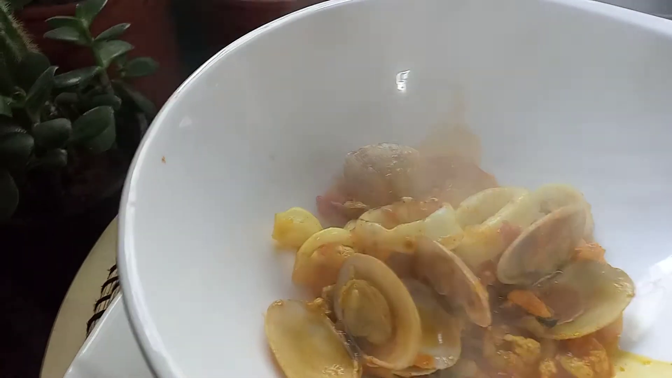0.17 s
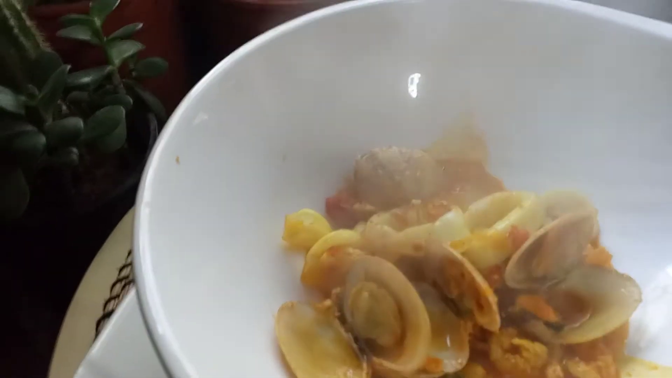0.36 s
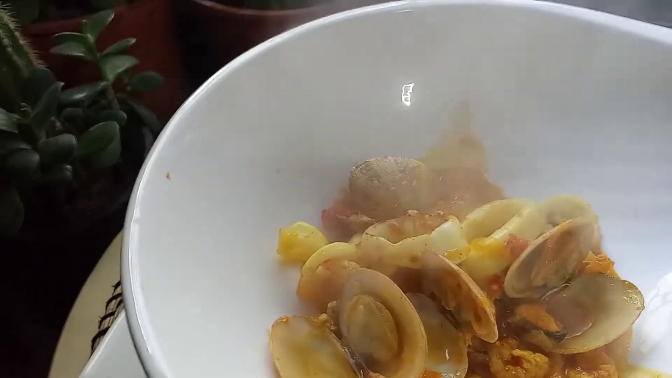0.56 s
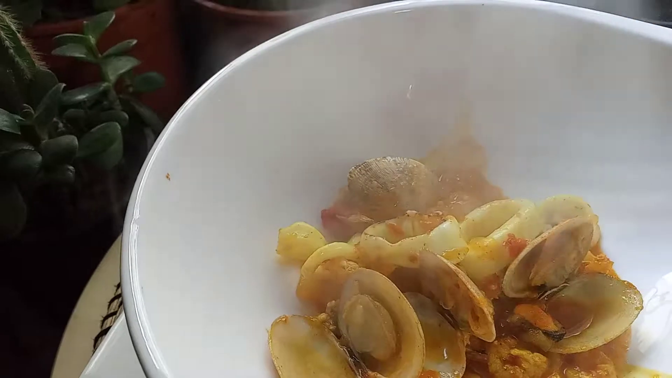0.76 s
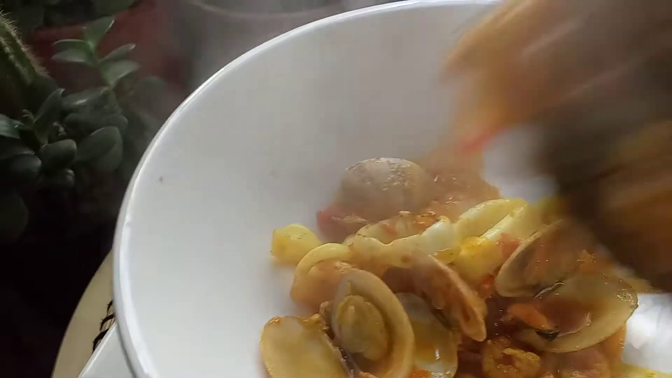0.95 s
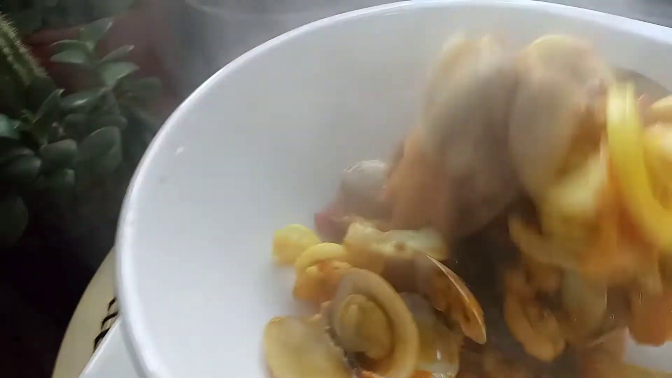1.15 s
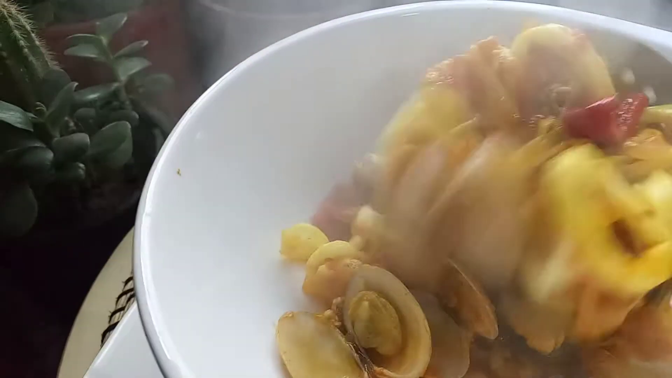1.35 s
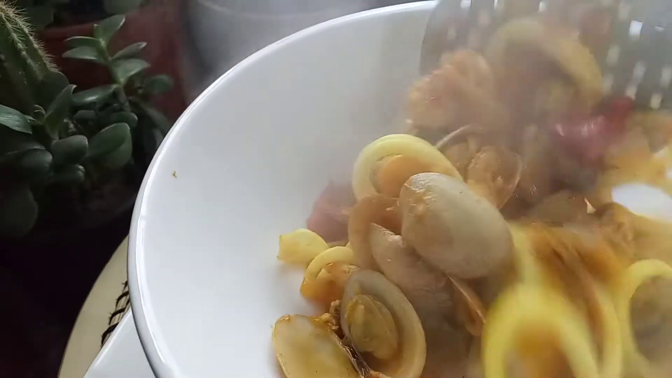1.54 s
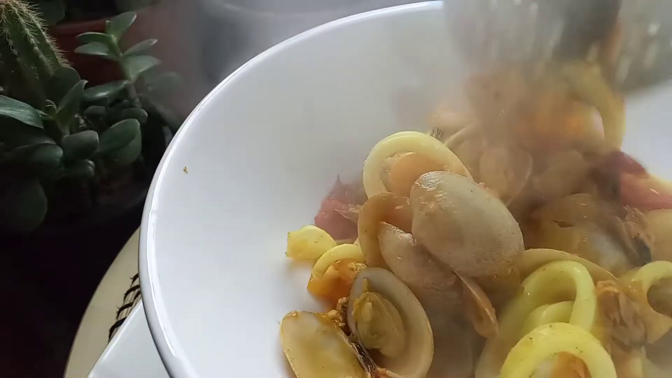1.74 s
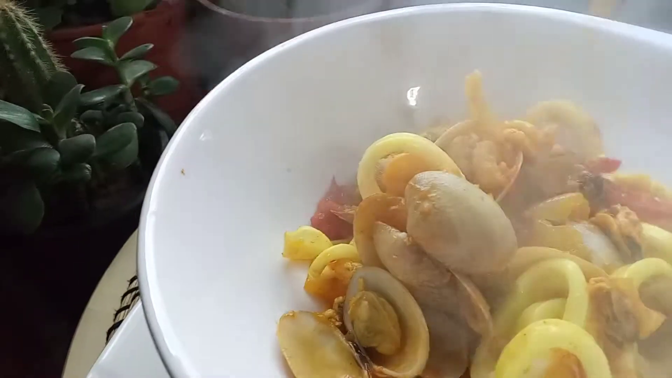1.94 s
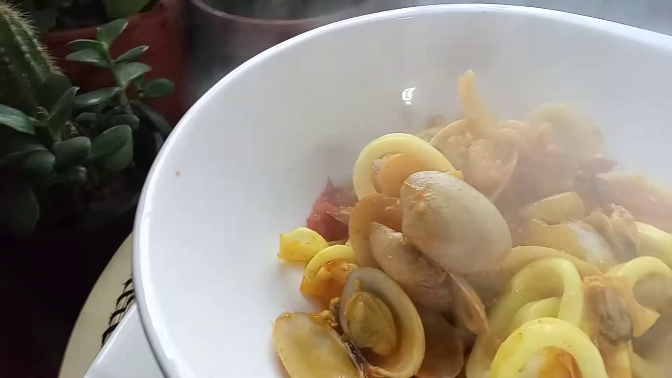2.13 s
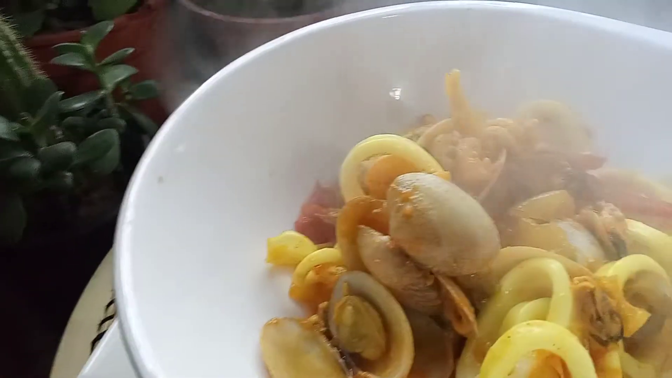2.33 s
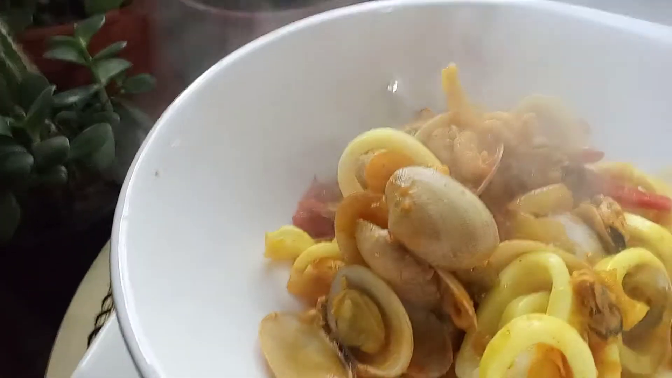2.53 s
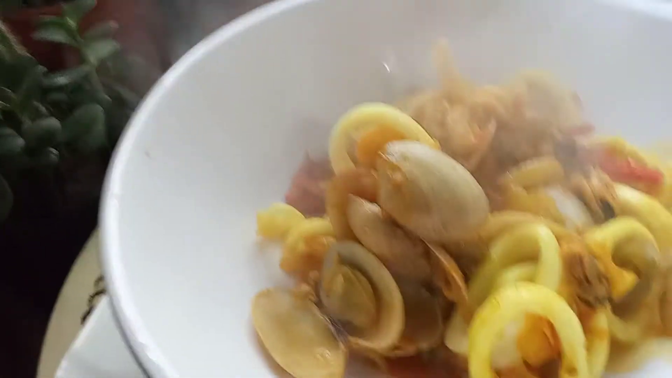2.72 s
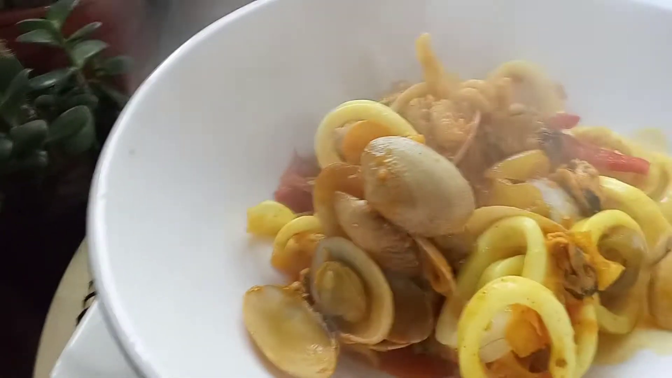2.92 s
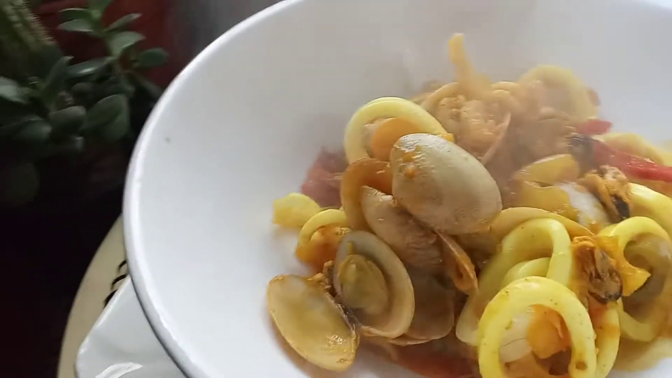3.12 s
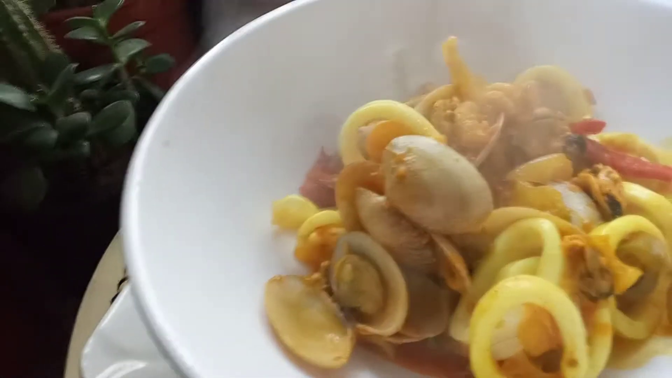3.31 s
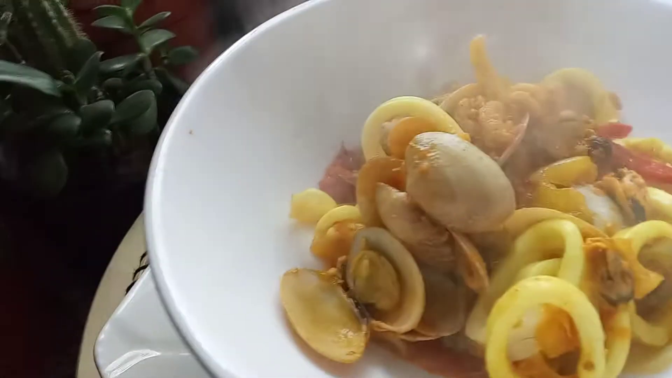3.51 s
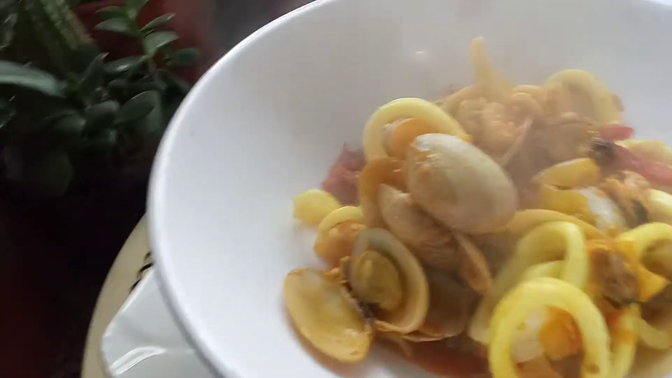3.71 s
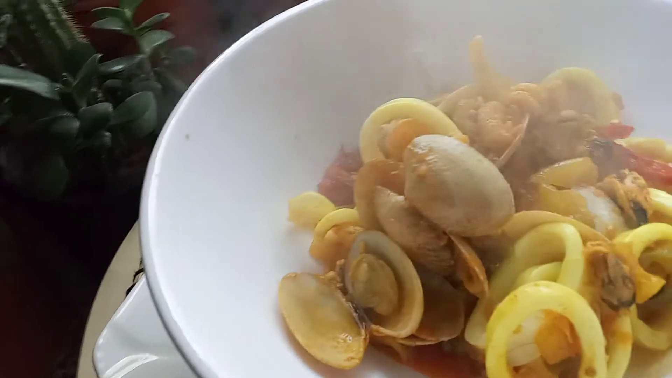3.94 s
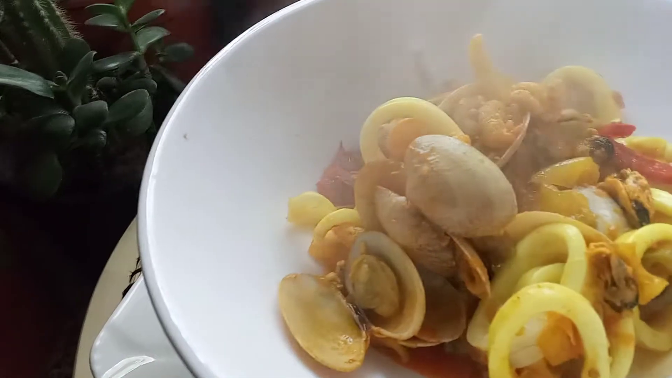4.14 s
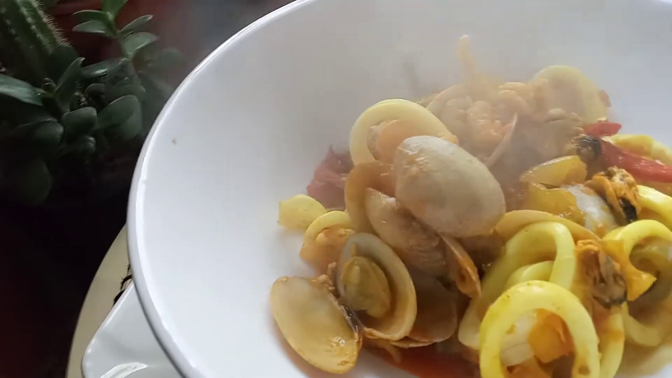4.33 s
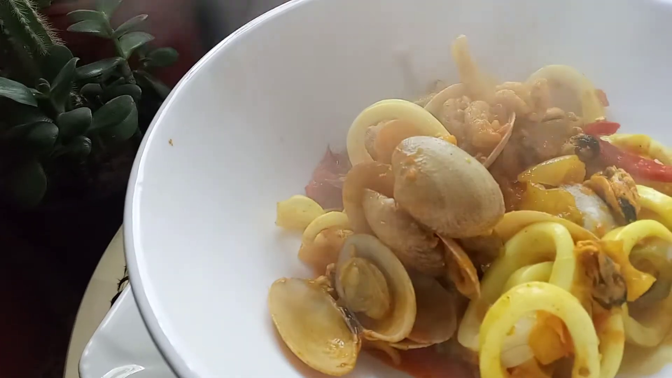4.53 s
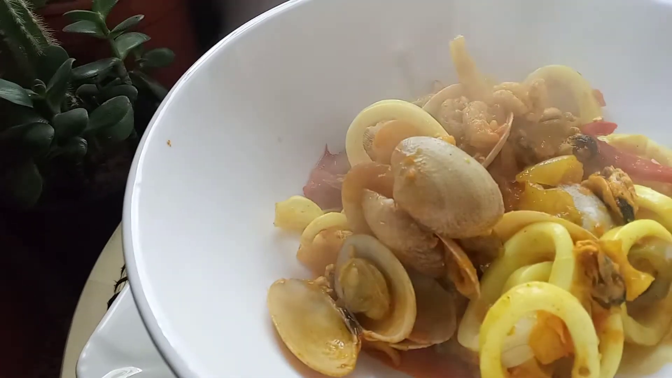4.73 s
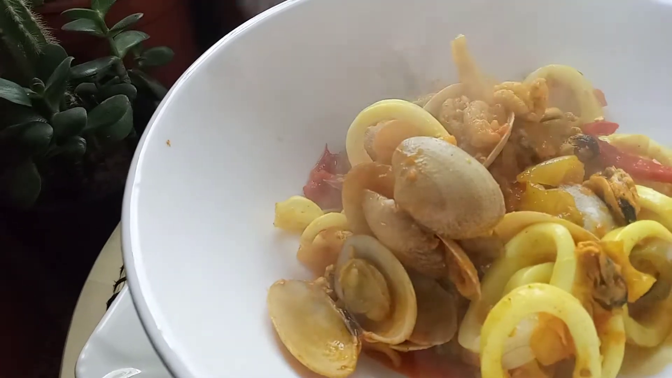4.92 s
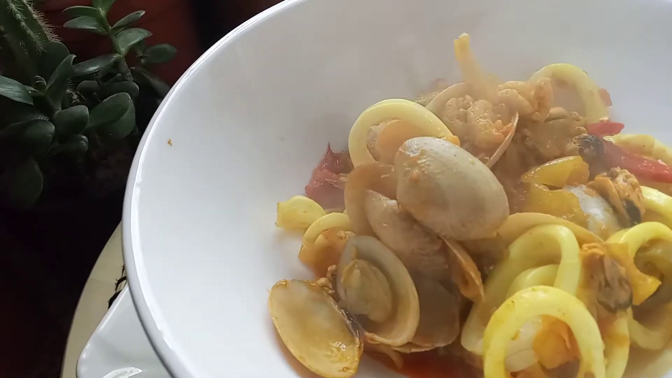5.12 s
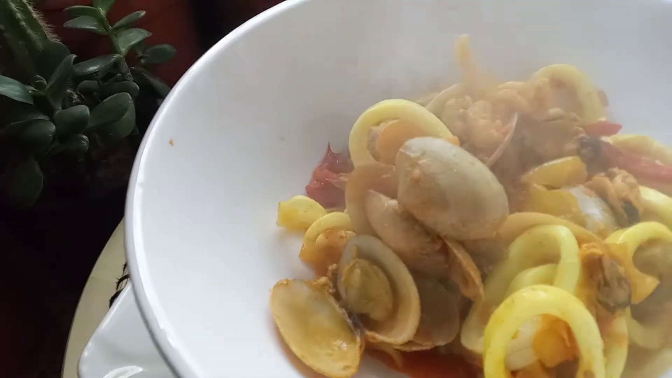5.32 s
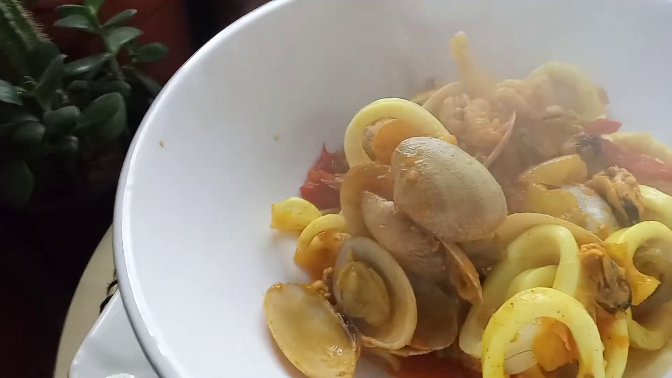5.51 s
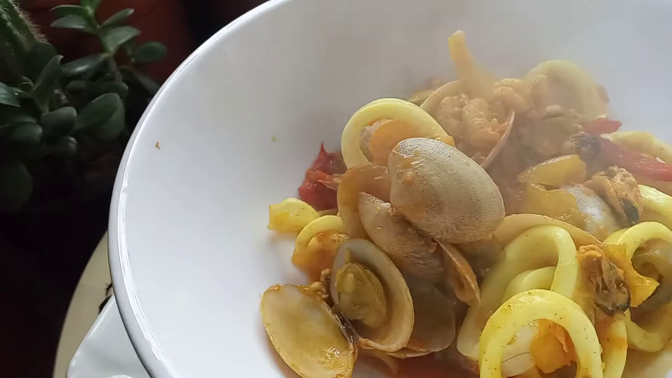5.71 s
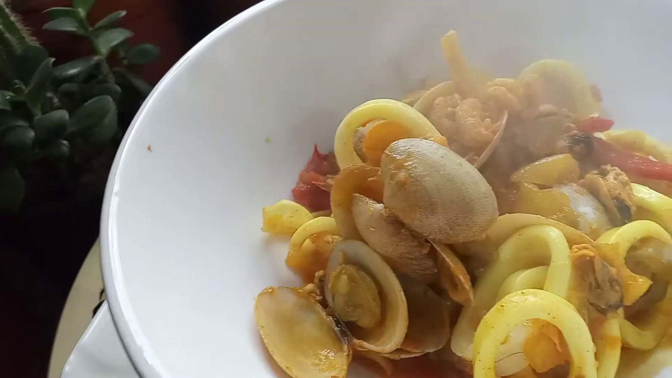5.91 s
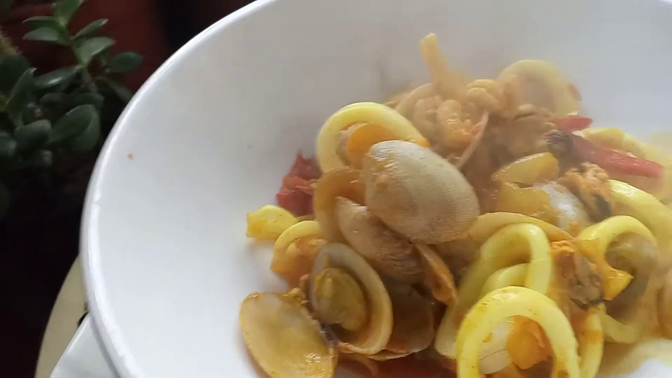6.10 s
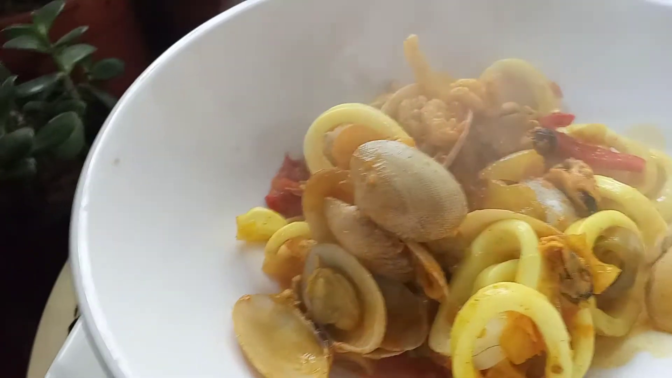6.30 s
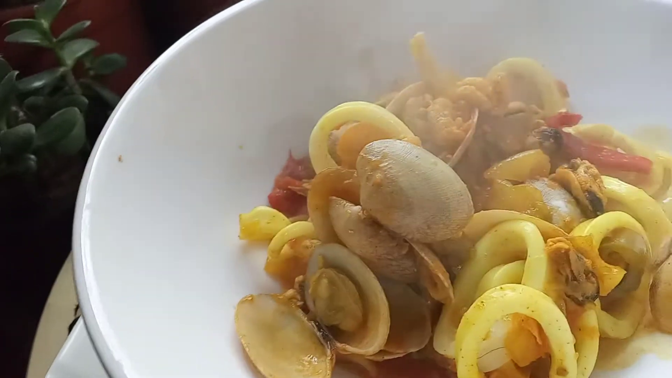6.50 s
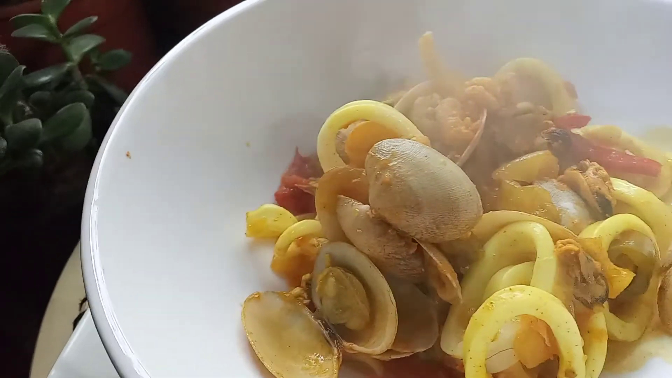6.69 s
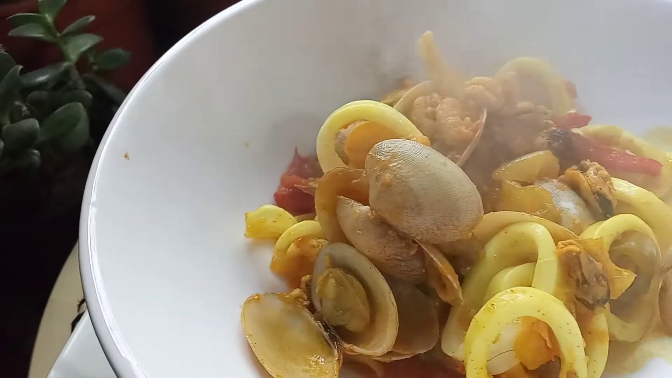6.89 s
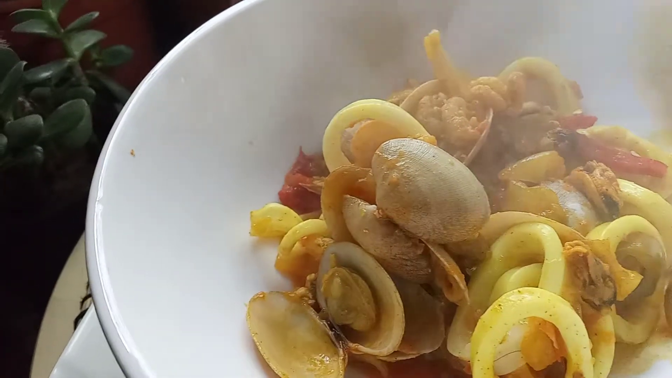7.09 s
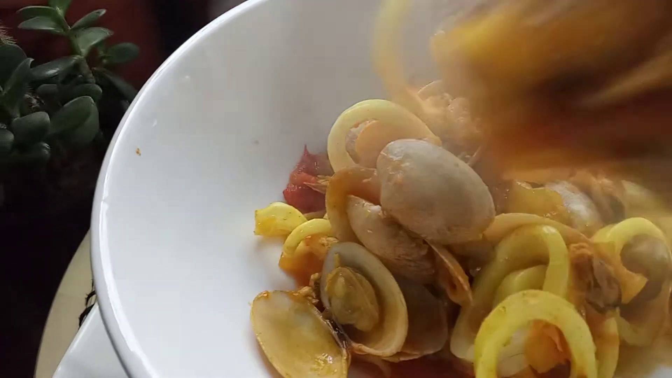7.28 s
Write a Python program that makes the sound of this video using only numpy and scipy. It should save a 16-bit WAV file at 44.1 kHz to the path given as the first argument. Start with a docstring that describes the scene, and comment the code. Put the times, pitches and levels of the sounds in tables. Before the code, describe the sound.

Clams and squid are spooned from a metal pan into a ceramic bowl, with shells clacking, gritty scraping, hard ringing knocks and wet bubbling over low hum.

```python
"""Sauce pops and bubbles softly over hiss and the hum of a kitchen appliance.
Then clams and squid are spooned from a metal pan into a bowl: the spoon knocks, shells tumble, the bowl rings.
The spoon scrapes up more; shells clack, wet food squelches and drains, and harder knocks ring shells and pan.
Struck things are noise bursts or dying tones, grinding is a rain of random clicks, hum and whistles are tones.
Loud sound drives a limiter, which briefly turns everything down, the hum included."""
import sys
import numpy as np
from scipy import signal
from scipy.fft import rfft, irfft
from scipy.io import wavfile
from scipy.ndimage import uniform_filter1d

SR = 44100
rng = np.random.default_rng(int(sys.argv[2]) if len(sys.argv) > 2 else 0)


def transcribe(signal):
    """Save signal, clipped to [-1, 1], as a 16-bit WAV file at the path in sys.argv[1]."""
    frames = np.atleast_2d(signal).T
    limited = np.clip(frames, -1, 1)
    pcm = np.round(limited * 32767).astype(np.int16)
    wavfile.write(sys.argv[1], SR, pcm)


N = 324135  # length in samples

GRIT_PER_S, WET_PER_S = 6000, 900  # average ticks a second in dense grit and in wet food
SHELL_WIDTH_HZ = 280  # half-width setting for the resonances of a wet shell
PUSH_DB = -35  # an ordinary push of the spoon


def amp(db):
    """Turns decibels into a gain."""
    return 10 ** (np.asarray(db) / 20)


def unit(x):
    """Scales a signal to an rms of one."""
    return x / np.sqrt(np.mean(x ** 2) + 1e-20)


def read(points, hz, column=1):
    """Reads one column of a table at any frequency, along a log-frequency axis."""
    columns = np.transpose(points)
    return np.interp(np.log(hz + 1), np.log(columns[0] + 1), columns[column])


def add(mix, start_s, sound):
    """Adds a two-channel sound to the mix at its start time."""
    part = mix[:, round(start_s * SR):][:, :sound.shape[1]]
    part += sound[:, :part.shape[1]]


def colour(x, curve_db, size=2048):
    """Filters with a gain curve in dB; a minimum-phase response keeps the filter from sounding early."""
    hz = abs(np.fft.fftfreq(size, 1 / SR))
    log_gain = np.log(amp(np.maximum(curve_db(hz), -100)))
    response = np.exp(np.conj(signal.hilbert(log_gain)))
    taps = np.fft.ifft(response).real[:size // 2]
    return signal.oaconvolve(x, taps[None], axes=1)[:, :x.shape[1]]


def slow_noise(rate_hz):
    """Noise that changes no faster than about the given rate, with an rms of one."""
    hz = np.fft.rfftfreq(N, 1 / SR)
    spectrum = rfft(rng.standard_normal(N)) / (1 + (hz / rate_hz) ** 4)
    return unit(irfft(spectrum, N))


def patches(shape, across, along):
    """Smoothed noise over frequency bins and time frames, with an rms of one."""
    noise = uniform_filter1d(rng.standard_normal(shape), size=along, axis=1)
    return unit(uniform_filter1d(noise, size=across, axis=0))


PORT_LAG = 22  # samples by which sound reaches the left microphone port later


def pair(a, b, same):
    """Two partly alike channels; the sound reaches the right port first."""
    left = np.concatenate([np.zeros(PORT_LAG), a[:-PORT_LAG]])
    right = same * a + np.sqrt(1 - same ** 2) * b
    return np.array([left, right])


def placed(x, lean_db):
    """Leans a two-channel sound to the left (positive) or the right (negative)."""
    return x * amp(np.array([[1], [-1]]) * lean_db / 2)


def swell(times_s, db):
    """Gain that follows a level curve and is silent outside it."""
    return amp(np.interp(np.arange(N) / SR, times_s, db, left=-np.inf, right=-np.inf))


ARCH_DB = 25.5  # how far the two ends of a sound lie under its middle


def arch(middle_s, length_s, db):
    """Gain that swells to its level and fades again."""
    away = 2 * (np.arange(N) / SR - middle_s) / length_s
    return amp(db - ARCH_DB * np.minimum(away ** 2, 20))


def uneven_ticks(per_s, spread_db):
    """Random moments, each with its own random strength; zero everywhere else."""
    strength = amp(spread_db * np.minimum(rng.exponential(1, N), 4))
    return strength * (rng.random(N) < per_s / SR)


def crackle(per_s, spread_db, spectrum):
    """Broad clicks of uneven size from slipping contacts, coloured by what they shake."""
    a, b = uneven_ticks(per_s, spread_db) * rng.standard_normal((2, N))
    return unit(colour(pair(a, b, same=0.46), lambda f: read(spectrum, f)))


def grains(per_s, spread_db, lo_hz, hi_hz, cycles, count=24, size=700):
    """A steady rain of tiny ringing ticks of many pitches; each fades to 1/e in the given cycles."""
    t, out = np.arange(size) / SR, np.zeros((2, N))
    kind = rng.integers(0, count, N)
    turns = rng.uniform(-np.pi, np.pi, count)
    push = uneven_ticks(per_s, spread_db) * rng.choice([-1, 1], N)
    for k, hz in enumerate(np.geomspace(lo_hz, hi_hz, count)):
        phase = np.array([[0], [turns[k]]])
        tick = np.sqrt(hz) * np.exp(-t * hz / cycles) * np.sin(2 * np.pi * hz * t + phase)
        out += signal.oaconvolve((push * (kind == k))[None], tick, axes=1)[:, :N]
    return unit(out)


def clumps():
    """Uneven gain: sticky food lets go in clumps."""
    return unit(amp(4.5 * slow_noise(45)))


def fizz():
    """Fine bright crackle of wet surfaces parting."""
    spectrum = [(1000, -27), (4000, -18.5), (7000, 2.5), (13000, -4.5), (15500, 1.5)]  # (Hz, dB)
    return clumps() * crackle(WET_PER_S, 3.5, spectrum)


def clack(pitches, decay_s, low_db, top_db, peak_db, width_hz, side_share=0.8, size=3000):
    """A brief contact wakes the crowded, fast-dying modes of a shell; a few stand out, the first most."""
    t = np.arange(size) / SR
    fade = np.exp(-np.maximum(t - .001, 0) / max(decay_s, .0003))
    onset = 1 - np.exp(-t / .00025)
    a, b = rng.standard_normal((2, size)) * fade * onset
    body = [(150, low_db - 11.5), (600, low_db - 3.5), (1500, low_db + 8.0), (2800, 3.35),
            (7500, -2.0), (10000, top_db), (16000, top_db)]  # (Hz, dB)

    def curve_db(f):
        peaks = [(side_share if k else 1) / (1 + ((f - hz) / width_hz) ** 2) for k, hz in enumerate(pitches)]
        return read(body, f) + peak_db * np.max(peaks, axis=0)

    x = colour(pair(a, b, same=0.063), curve_db)
    loudest = uniform_filter1d((x ** 2).mean(0), size=88).max()  # power over 2 ms
    return x / np.sqrt(loudest)


# How long the kitchen echoes. Each row: frequency in Hz, time to fade by 60 dB in seconds.
ROOM_FADE = [(200, 1), (1000, 0.58), (3000, 0.51), (7000, 0.41), (15000, 0.38)]


def kitchen(x, first_s=0.0017, near_db=6, near_s=0.008, size=30000):
    """Reflections from the near worktop, then from the walls, the treble dying first."""
    taps = rng.standard_normal((2, size)) * (rng.random((2, size)) < .2)
    taps = taps * (np.arange(size) > first_s * SR)
    taps = taps * (1 + amp(near_db) * np.exp(-np.arange(size) / SR / near_s))
    hz, t, z = signal.stft(taps, SR, nperseg=256)
    fade = amp(-60 * t / read(ROOM_FADE, hz)[:, None])
    tail = signal.istft(z * fade, SR, nperseg=256)[1]
    return signal.fftconvolve(x, tail / np.linalg.norm(tail[0]), axes=1)[:, :N]


HUM_HZ = 100  # twice the mains frequency


def hum(level_db=-47.5, waver=0.22, flutter_hz=24, lean_db=2.5):
    """An appliance hums at twice the mains frequency, wavering a little, louder on the right."""
    drift = 1 + waver * (slow_noise(flutter_hz) + 1j * slow_noise(flutter_hz))
    tone = drift * np.exp(2j * np.pi * HUM_HZ * np.arange(N) / SR)
    return amp(level_db + lean_db * np.array([[-1], [1]])) * unit(tone.real)


# Background hiss, before its overall trim.
# Each row: frequency in Hz, left level in dB per Hz, right level in dB per Hz.
HISS_SPECTRUM = [(25.2, -102.5, -93), (59, -82.5, -72.5), (142.6, -76, -105), (298, -99.5, -84),
                 (670, -99.0, -97), (1230, -103.0, -103.0), (2130, -97, -96), (3600, -105.0, -106.0),
                 (4680, -104.0, -105.0), (7430, -87, -105.0), (8750, -107.0, -106.0),
                 (11100, -119.0, -94.5), (12440, -120.0, -109.0), (15300, -109.0, -104.0)]


def hiss(level_db=-0.5, same_hz=450):
    """Background noise, alike in both ports only in the bass; its lower middle drifts in patches."""
    hz = np.fft.rfftfreq(N, 1 / SR)
    a, b = rfft(rng.standard_normal((2, N)))
    same = 1 / (1 + (hz / same_hz) ** 2)
    left = a * amp(read(HISS_SPECTRUM, hz, column=1))
    right = (same * a + np.sqrt(1 - same ** 2) * b) * amp(read(HISS_SPECTRUM, hz, column=2))
    x = amp(level_db) * np.sqrt(SR / 2) * irfft(np.array([left, right]), N)
    hz, _, z = signal.stft(x, SR, nperseg=1024)
    middle = ((hz > 200) & (hz < 2500))[:, None]
    drift_db = 2.5 * patches(z.shape[1:], across=4, along=12) * middle
    return signal.istft(z * amp(drift_db), SR, nperseg=1024)[1][:, :N]


# Sticky pops of sauce. Each row: start in seconds, level in dB before the group's gain, pitch in Hz.
SAUCE_POPS = [(0.099, -35.5, 14600), (0.115, -41.5, 6400), (0.175, -35.5, 13800), (0.206, -33, 6560),
              (0.282, -28.5, 7200), (0.308, -46, 9600), (0.422, -37, 6500), (0.437, -49, 14500),
              (0.472, -40, 13900), (0.454, -39, 6900), (0.48, -41, 3860), (0.536, -43, 7300),
              (1.278, -29, 11100), (1.302, -23.5, 10800), (1.624, -46, 7350), (1.664, -43, 7000),
              (2.391, -45.5, 6340), (4.515, -35, 6940), (4.593, -31, 6600), (4.611, -30.5, 3440),
              (4.863, -32, 4300), (5.27, -33.5, 6000), (5.397, -35.5, 6950), (5.592, -39, 6200),
              (5.653, -42, 5000), (5.689, -37, 6660), (5.703, -41, 4500), (5.839, -39, 6800),
              (5.928, -33.5, 7200), (6.017, -33, 6640), (6.038, -35.5, 6660), (6.169, -20, 14500),
              (6.2, -27, 10400), (6.296, -27, 6500), (6.446, -37, 5500), (6.561, -43, 7830),
              (6.585, -35, 6130), (6.67, -37, 7100), (6.72, -31, 4190), (6.738, -31, 6900)]


def pops(gain_db=-4):
    """Films of sauce snap: very short, bright noise bursts with almost no low body."""
    out = np.zeros((2, N))
    for start_s, db, hz in SAUCE_POPS:
        snap = clack([hz], decay_s=0.0031, low_db=-69, top_db=0.5, peak_db=19.0, width_hz=1400)
        add(out, start_s, amp(db + gain_db) * snap)
    return placed(out, lean_db=4.0)


# Air pockets bursting in the sauce.
# Each row: start in seconds, level in dB before the group's gain, starting pitch in Hz.
AIR_POCKETS = [(0.118, -40, 3960), (0.2201, -28, 2370), (0.455, -36.5, 2670), (0.483, -36, 2950),
               (4.397, -21, 1686), (4.417, -23.5, 3260), (4.487, -27, 2580), (4.523, -31, 1594),
               (4.6446, -23, 1620), (4.649, -19.5, 1030), (4.585, -28, 3360), (4.894, -32, 2000),
               (4.914, -41, 1490), (4.977, -30, 2370), (5.097, -25.5, 1880), (5.12, -34, 1550),
               (5.135, -34, 1130), (5.234, -34, 1560), (5.356, -34, 1650), (5.555, -32, 3230),
               (5.707, -26, 2980), (5.32, -18.5, 1995), (5.422, -30.5, 1400), (5.447, -21.5, 1610),
               (5.963, -26.5, 1530), (6.766, -25.5, 1035)]
BUBBLE_CYCLES = 7.1  # an air pocket fades to 1/e in this many cycles, so low ones ring longer


def bubbles(gain_db=-2, rise=1.15, size=2500):
    """Each air pocket rings for a few cycles and rises slightly in pitch as it opens."""
    out, t = np.zeros((2, N)), np.arange(size) / SR
    for start_s, db, hz in AIR_POCKETS:
        decay_s = BUBBLE_CYCLES / hz
        note = np.sin(2 * np.pi * hz * t * (1 + rise * t)) * np.exp(-t / decay_s)
        snap = 0.12 * rng.standard_normal((2, size)) * np.exp(-2 * t / decay_s)
        add(out, start_s, amp(db + gain_db) * pair(note + snap[0], note + snap[1], same=1.0))
    return out


RING_FLUTTER, FLUTTER_HZ = .2, 60  # settling food makes each mode flutter: depth, changes a second


def ring(modes, tilt=0, size=40000):
    """Dying modes, each with its own phase at the two ports; a soft blow (negative tilt) favours the low."""
    t, out = np.arange(size) / SR, np.zeros((2, size))
    hz, db, t60 = np.transpose(modes)
    gain = amp(db + tilt * np.log2(hz))
    start, apart = rng.uniform(-np.pi, np.pi, (len(modes), 2)).T
    apart = apart / 2 + np.pi * ((hz > 500) & (hz < 700))  # these modes are turned round between the ports
    for g, f, fade_s, phase, shift in zip(gain, hz, t60, start, apart):
        shake = 1 + RING_FLUTTER * np.interp(t, np.arange(200) / FLUTTER_HZ, rng.standard_normal(200))
        wave = np.sin(2 * np.pi * f * t + phase + np.array([[0], [shift]]))
        out += g * shake * amp(-60 * t / fade_s) * wave
    return out / np.linalg.norm(gain)


# Hard knocks. Each row: start in seconds, contact level in dB, contact decay in seconds, its low body in dB,
# its send to the room in dB, three shell resonances in Hz, what rings on, ring level in dB,
# tilt of the ring in dB per octave.
HARD_KNOCKS = [(0.990, -0.5, 0.0044, -5, -12, 3560, 4870, 6650, "shell", -16, -5),
               (1.289, -19, 0.0064, -22, -3, 1980, 5340, 4220, "bowl", -24, -3),
               (1.381, -6, 0.0059, -18, -14, 5500, 7800, 4300, "bowl", -10.5, -0.5),
               (1.386, -5.5, 0.0047, -9.5, -7.5, 4400, 5460, 7600, "shell", -32.5, 3),
               (4.7, -6, 0.0012, -9, -7, 5500, 6620, 7500, "shell", -36, 6),
               (4.707, -5, 0.0033, -11.5, -7.5, 2880, 3720, 2070, "shell", -25, 1),
               (5.757, -8.5, 0.0013, -12, -10, 1738, 6600, 5720, "shell", -39, -14.5),
               (6.111, 1.5, 0.0086, -8.5, -14, 3570, 2870, 4570, "pan", -10, -1),
               (6.168, 1, 0.0048, -19.5, -9, 7900, 7700, 7650, "pan", -21.5, -4),
               (7.347, -15, 0.00077, -13.5, -16, 2960, 3160, 6330, "shell", -40, 13.5)]
# What the bowl rings with. Each row: frequency in Hz, relative level in dB, time to fade by 60 dB in seconds.
BOWL_MODES = [(530, -16, .35), (640, -17, .35), (1125, -9, .33), (1195, -10.5, .57), (1981, -5, .5),
              (2072, -8, .42), (3138, 2.5, .45), (3327, -16, .33), (4151, -7.5, .42), (4393, -4.5, .4),
              (4740, -18, .35), (5445, -7, .35), (5785, -5, .34), (6315, -20, .42), (7117, -18, .42),
              (7420, -14, .33), (7478, -14, .36), (7671, -16, .28), (8120, -20, .35), (8452, -20, .28),
              (8861, -19, .29)]
# What the pan rings with. Each row: frequency in Hz, relative level in dB, time to fade by 60 dB in seconds.
PAN_MODES = [(232, -14.5, .45), (345, -20, .3), (570, -13, .4), (1095, -9.5, .44), (1157, -17, .35),
             (1997, -14, .55), (2353, 1.5, .48), (2392, -12, .35), (2772, -2.5, .38), (2850, -7, .45),
             (2961, -0.5, .47), (3030, -8, .42), (3085, -11, .55), (3500, -5.5, .43), (3550, -8, .35),
             (4283, -15, .5), (4775, -13, .5), (4856, -11, .45), (5324, -15, .44), (5895, -17, .45),
             (6019, -15, .43), (6611, -13, .45), (7262, -12, .4), (7628, -17, .38), (7876, -14, .34)]
# A shell's modes lie in close groups. Each entry: ratio to the group's resonance.
SHELL_RATIOS = (.962, .989, 1.008, 1.035)
SHELL_CYCLES = 760  # a ringing shell fades by 60 dB in this many cycles of its resonance


def knocks(ring_room_db=-18):
    """Spoon and shells strike hard, and the bowl, the pan or the shell itself rings on."""
    near, sent = np.zeros((2, 2, N))
    for start_s, db, decay_s, low_db, room_db, *pitches, struck, ring_db, tilt in HARD_KNOCKS:
        shell = [(hz * ratio, 0, SHELL_CYCLES / hz) for hz in pitches for ratio in SHELL_RATIOS]
        modes = {"bowl": BOWL_MODES, "pan": PAN_MODES, "shell": shell}[struck]
        contact = amp(db) * clack(pitches, decay_s, low_db, top_db=-15, peak_db=13.5, width_hz=SHELL_WIDTH_HZ)
        ringing = amp(ring_db) * ring(modes, tilt)
        for sound, send_db in (contact, room_db), (ringing, ring_room_db):
            add(near, start_s, sound)
            add(sent, start_s, amp(send_db) * sound)
    return near + kitchen(sent)


# The spoon bumps the bowl or the floor of the pan.
# Each row: start in seconds, peak level in dB before the group's gain, pitch in Hz.
BUMPS = [(0.991, -33, 706), (2.742, -34, 297), (2.931, -29.5, 590), (2.978, -29, 644), (3.268, -31, 430),
         (3.477, -29, 365), (3.522, -22, 360), (3.586, -21.5, 660), (6.111, -30, 630), (6.229, -30, 424)]
# Colour of low bumps and rubbing. Each row: frequency in Hz, level in dB.
RUB_SPECTRUM = [(88, -55), (150, -22.5), (243, -4), (312, -4.5), (360, -1), (528, -5), (662, 1.5),
                (743, -11), (1100, 0.5), (1430, -39), (2420, -120)]


def thuds(gain_db=4, decay_s=0.022, peak_db=9, width_hz=90, size=5000):
    """A dull push is a dying noise burst with low resonances; one stands out."""
    out, t = np.zeros((2, N)), np.arange(size) / SR
    for start_s, db, hz in BUMPS:
        push = rng.standard_normal((2, size)) * np.exp(-t / decay_s)
        curve_db = lambda f: read(RUB_SPECTRUM, f) + peak_db / (1 + ((f - hz) / width_hz) ** 2)
        x = colour(push, curve_db, size=8192)
        add(out, start_s, amp(db + gain_db) * x / abs(x).max())
    return out


# Shells clacking. Each row: start in seconds, level in dB before the group's gain,
# main resonance in Hz, second resonance in Hz, decay in seconds.
SHELL_CLACKS = [(1.003, -9.5, 3420, 5100, 0.0032), (1.01, -9.5, 3450, 5370, 0.0069),
                (1.019, -17, 5000, 3600, 0.0084), (1.027, -18, 3340, 5100, 0.0054),
                (1.034, -13, 3600, 5160, 0.0027), (1.083, -24, 2130, 3520, 0.0074),
                (1.194, -32, 1800, 2450, 0.0013), (1.25, -26.5, 1400, 2640, 0.0055),
                (1.260, -19, 1630, 2600, 0.01), (1.276, -21, 2320, 1490, .006),
                (1.322, -23, 1790, 2670, 0.0077), (1.416, -16.5, 5500, 7600, 0.013),
                (1.523, -17, 4880, 6000, 0.0022), (2.709, -39, 2120, 3640, 0.0025),
                (2.740, -22.5, 3300, 6460, 0.0075), (2.861, -17.5, 3900, 6540, 0.0088),
                (2.909, -20, 3350, 2500, 0.0019), (2.934, -18, 2900, 3500, 0.003),
                (3.032, -33, 3450, 2330, 0.0019), (3.089, -23, 1060, 1870, 0.012),
                (3.134, -26, 2780, 1490, 0.0058), (3.282, -35.5, 6750, 2670, 0.0092),
                (3.326, -26.5, 2670, 3980, 0.0025), (3.479, -15.5, 3270, 3880, 0.0019),
                (3.532, -17.5, 3950, 3220, 0.0066), (3.568, -16.5, 2820, 3900, .008),
                (3.589, -15.5, 2960, 6480, 0.011), (3.601, -29, 2840, 6360, 0.0089),
                (3.642, -8.5, 4630, 6500, 0.0017), (3.863, -26, 2940, 2180, 0.0086),
                (4.072, -15.5, 4630, 1230, 0.0016), (4.164, -28.5, 3120, 1793, 0.0022),
                (4.215, -14.5, 2820, 2440, 0.0092), (4.258, -18.5, 6800, 4670, 0.0027),
                (4.278, -25.5, 7440, 2400, 0.0056), (4.302, -23.5, 5380, 3580, 0.0061),
                (4.444, -23.5, 2830, 3130, 0.0062), (5.011, -15, 3230, 7250, 0.002),
                (5.167, -27, 5850, 3050, 0.017), (5.288, -25, 2900, 3770, 0.0047),
                (5.292, -25.5, 6670, 1600, .004), (5.304, -27.5, 7400, 5500, 0.002),
                (5.448, -26, 1630, 5000, 0.0049), (5.719, -24.5, 4420, 1870, 0.0017),
                (5.971, -27, 6970, 3160, 0.0082), (5.988, -26.5, 3210, 2600, 0.0078),
                (6.198, -14, 7250, 6350, 0.0021), (6.233, -16, 7450, 6540, 0.0031)]


def clacks(gain_db=-3):
    """Shell meets shell: all share one body colour, each with its own two resonances."""
    out = np.zeros((2, N))
    for start_s, db, *pitches, decay_s in SHELL_CLACKS:
        hit = clack(pitches, decay_s, low_db=-8.5, top_db=-20, peak_db=13, width_hz=SHELL_WIDTH_HZ)
        add(out, start_s, amp(db + gain_db) * hit)
    return out


def shifting(x):
    """As one shell after another meets the spoon, resonances come and go, some 350 Hz wide and 50 ms long."""
    z = signal.stft(x, SR, nperseg=512)[2]
    gain = amp(3 * patches(z.shape[1:], across=4, along=9))
    return unit(signal.istft(z * gain, SR, nperseg=512)[1][:, :N])


# The scraping spoon makes the loaded pan sing. Each row: frequency in Hz, width in Hz, level in dB.
SING_RESONANCES = [(590, 81, -6), (1000, 125, 0.5), (2820, 180, 4), (6400, 210, -9)]


def singing():
    """Slips of the spoon feed a few damped resonances of the pan."""
    slips = crackle(WET_PER_S, spread_db=2.5, spectrum=[(20, 0), (20000, 0)])

    def curve_db(f):
        gain = sum(amp(db) / (1 + (2 * (f - hz) / width) ** 2) for hz, width, db in SING_RESONANCES)
        return 20 * np.log10(gain)

    return unit(colour(slips, curve_db))


# Colour of grinding shells. Each row: frequency in Hz, level in dB.
GRIT_SPECTRUM = [(350, -52), (600, -8.5), (954, -7), (1040, 0), (1260, 0), (1880, 0), (3650, 2.5),
                 (5250, -10), (7270, -7.5), (9340, -29.5), (12000, -35), (15600, -45), (22000, -120)]
# A spoonful tumbling into the bowl. Each row: time in seconds, effort in dB.
TUMBLE_EFFORT = [(1.189, -47), (1.24, -41.5), (1.255, -34), (1.295, -26), (1.321, -14), (1.345, -64)]
# How hard the spoon pushes through the shells in the pan. Each row: time in seconds, effort in dB before a trim.
SCOOP_EFFORT = [(2.861, -43), (2.93, -41), (3.02, -39), (3.1, -34.5), (3.15, -37), (3.22, -47),
                (3.45, -39.5), (3.55, -33), (3.587, -24.5), (3.649, -34.5), (3.8, -47.5), (3.95, -39.5),
                (4.1, -42), (4.19, -50.5), (4.28, -36.5), (4.437, -46)]
# The food is jolted when the pan is knocked, then settles.
# The one row: start in seconds, effort in dB, fall in dB a second.
PAN_JOLT = (6.14, -28, 75)
RUB_PER_DB, FIZZ_PER_DB = .8, 1.2  # dB gained per dB of effort; the rub of the jolt gains 2 instead
CUSHION_DB_PER_S = 5.5  # food gathering under the spoon cushions the scoop's low rub


def scraping(grit_db=-2.0, chip_db=-5.5, sing_db=-10, fizz_db=-19, scoop_db=2,
             scoop_rub_db=-41, jolt_rub_db=-60, tumble_rub_db=-62):
    """Shells grind and chip over each other and the pan; one effort drives grit, low rub and wet fizz."""
    t = np.arange(N) / SR
    slips = unit(amp(2 * slow_noise(70)))
    grit = amp(grit_db) * shifting(crackle(GRIT_PER_S, spread_db=1.0, spectrum=GRIT_SPECTRUM))
    chips = grains(WET_PER_S, spread_db=1.0, lo_hz=665.0, hi_hz=8240, cycles=19)
    chips = amp(chip_db) * unit(colour(chips, lambda f: read(GRIT_SPECTRUM, f)))
    grit = slips * (grit + chips)
    sing = amp(sing_db) * slips * singing()
    rub = grains(per_s=1100, spread_db=6.0, lo_hz=196.1, hi_hz=927, cycles=9.4, size=4000)
    rub = slips * unit(colour(rub, lambda f: read(RUB_SPECTRUM, f)))
    # each effort is one at an ordinary push
    tumble = swell(*np.transpose(TUMBLE_EFFORT)) / amp(PUSH_DB)
    scoop = swell(*np.transpose(SCOOP_EFFORT)) * amp(scoop_db - PUSH_DB)
    jolt_s, jolt_db, fall = PAN_JOLT
    jolt = swell([jolt_s, jolt_s + 1], [jolt_db, jolt_db - fall]) / amp(PUSH_DB)
    effort = tumble + scoop + jolt
    cushion = amp(-CUSHION_DB_PER_S * np.maximum(t - SCOOP_EFFORT[0][0], 0))
    press = amp(tumble_rub_db) * tumble ** RUB_PER_DB
    press = press + amp(scoop_rub_db) * cushion * scoop ** RUB_PER_DB
    press = press + amp(jolt_rub_db) * jolt ** 2
    wet = amp(fizz_db) * effort ** FIZZ_PER_DB * fizz()
    return amp(PUSH_DB) * (effort * grit + scoop * sing + wet) + press * rub


# Faint thin whistles, perhaps of steam.
# Each row: middle in seconds, length in seconds, level in dB before the flutter, pitch in Hz.
THIN_WHISTLES = [(2.29, 0.58, -58.5, 2617), (7.045, 1.6, -57, 6230)]


def whistles():
    """Narrow, slightly unsteady tones that come and go just above the hiss."""
    t = np.arange(N) / SR
    flutter = .55 + .3 * np.array([slow_noise(130), slow_noise(130)])
    return sum(arch(middle_s, length_s, db) * flutter * np.sin(2 * np.pi * hz * t)
               for middle_s, length_s, db, hz in THIN_WHISTLES)


def rattle(gain_db=5, spread_db=4, lo_hz=1500, hi_hz=5500, count=30):
    """Loose shells knock at random while the spoon pushes, harder with effort up to an ordinary push."""
    out, (times, effort_db) = np.zeros((2, N)), np.transpose(SCOOP_EFFORT)
    for when, strength, pitch in rng.random((count, 3)):
        start_s = times[0] + when * (times[-1] - times[0])
        push_db = np.interp(start_s, times, np.minimum(effort_db, PUSH_DB))
        db = push_db + gain_db + spread_db * (2 * strength - 1)
        hz = lo_hz * (hi_hz / lo_hz) ** pitch
        hit = clack([hz], decay_s=0.005, low_db=-3.5, top_db=-25, peak_db=15.0, width_hz=SHELL_WIDTH_HZ)
        add(out, start_s, amp(db) * hit)
    return out


# Wet shells sliding over each other round the spoon.
# Each row: middle in seconds, length in seconds, level in dB before the group's gain.
SHELL_SLIDES = [(3.1, 0.25, -34), (3.403, 0.14, -43), (3.914, 0.19, -40.5), (4.092, 0.26, -35)]


def slides(gain_db=-1):
    """Wet shells slide round the spoon: a dense rain of short ticks that swells and fades."""
    ticks = grains(GRIT_PER_S, spread_db=2.5, lo_hz=750, hi_hz=3300, cycles=5)
    return amp(gain_db) * sum(arch(*row) for row in SHELL_SLIDES) * ticks


# Wet food squeaks under the spoon.
# Each row: start in seconds, length in seconds, level in dB, start pitch in Hz, end pitch in Hz.
FOOD_SQUEAKS = [(3.361, 0.061, -34.5, 1933, 1880), (3.378, 0.032, -38, 1894, 1192)]


def squeaks(rough=0.47):
    """Wet food sticks and slips on the spoon: short, rough, gliding tones."""
    out, grain = np.zeros((2, N)), slow_noise(160) + 1j * slow_noise(160)
    for start_s, length_s, db, start_hz, end_hz in FOOD_SQUEAKS:
        u = np.linspace(0, 1, round(length_s * SR))
        turn = np.exp(2j * np.pi * np.cumsum(start_hz + (end_hz - start_hz) * u) / SR)
        roughness = 1 + rough * grain[round(start_s * SR):][:len(u)]
        tone = np.sin(np.pi * u) * (turn * roughness).real
        add(out, start_s, amp(db) * pair(tone, tone, same=0.94))
    return out


# Wet food pulling apart.
# Each row: middle in seconds, length in seconds, level in dB before the group's gain.
FOOD_SQUELCHES = [(4.587, 0.8, -42), (4.916, 0.068, -32), (5.094, 0.14, -42), (5.299, 0.23, -33.5),
                  (5.474, 0.14, -35.5), (5.988, 0.31, -44)]


def squelches(gain_db=-3):
    """Lifted food pulls apart: clumps of very short ringing ticks."""
    ticks = grains(WET_PER_S, spread_db=1.5, lo_hz=1400, hi_hz=7860, cycles=2.5)
    return amp(gain_db) * sum(arch(*row) for row in FOOD_SQUELCHES) * clumps() * ticks


# The lifted spoonful drains. The one row: start in seconds, end in seconds.
DRAIN_SPAN = (5.6, 7.1)
DRAIN_DB_PER_S = 16.5  # how fast the draining dies down


def draining(fizz_db=-50, drip_db=-57):
    """The lifted food fizzes and drips in random small plops, dying down."""
    drips = grains(per_s=110, spread_db=2.2, lo_hz=1500, hi_hz=7500, cycles=7)
    fall_db = DRAIN_DB_PER_S * (DRAIN_SPAN[1] - DRAIN_SPAN[0])
    return swell(DRAIN_SPAN, [0, -fall_db]) * (amp(fizz_db) * fizz() + amp(drip_db) * drips)


# Where the spoon works, first over the bowl and then in the pan.
# Each row: time in seconds, lean in dB (positive is left).
SPOON_POSITION = [(1.6, -4.5), (2.7, 1.5)]
# Colour of the two microphone ports. Each row: frequency in Hz, left gain in dB, right gain in dB.
PORT_COLOUR = [(830, -8.5, -8), (1440, -2.5, -5.5), (4250, 1, -5), (5500, 3.5, 0.5), (7000, 7, -9),
               (9160, 5.5, -1.5), (10660, 1.5, 10), (14500, -5.5, -3), (14360, 9, 3)]


def scene():
    """All the serving sounds, with their room, as the two ports hear them, over hum, hiss and whistles."""
    sauce = pops() + bubbles()
    shells = thuds() + clacks() + scraping() + rattle() + slides() + squeaks() + squelches() + draining()
    shells = placed(shells, np.interp(np.arange(N) / SR, *np.transpose(SPOON_POSITION)))
    x = knocks() + shells + sauce + kitchen(amp(-7.0) * shells + amp(-6.0) * sauce)
    left = colour(x[:1], lambda f: read(PORT_COLOUR, f, column=1))
    right = colour(x[1:], lambda f: read(PORT_COLOUR, f, column=2))
    return np.vstack([left, right]) + hum() + hiss() + whistles()


CEILING_DB, SUSTAINED_DB = -2, -15.5  # limiter thresholds for peaks and for sustained power
LOOK_AHEAD_S, RELEASE_S = 0.054, 0.05  # ramp of a full dip before a loud sound; time constant of letting go
EDGE_HZ = 16000  # the band limit


def record(dry):
    """A look-ahead limiter holds down peaks and sustained power, then lets go; a low-pass limits the band."""
    peak_db = 20 * np.log10(abs(dry).max(0) + 1e-9)
    keep = np.exp(-1 / (.005 * SR))  # power is smoothed over 5 ms
    power = signal.lfilter([1 - keep], [1, -keep], dry ** 2).max(0)
    power_db = 10 * np.log10(power + 1e-12)
    over_db = np.maximum(np.maximum(peak_db - CEILING_DB, power_db - SUSTAINED_DB), 0)
    t = np.arange(N) / SR
    # each dip decays exponentially afterwards
    log_dip = np.log(1 - amp(-over_db) + 1e-9)
    dip = np.exp(np.maximum.accumulate(log_dip + t / RELEASE_S) - t / RELEASE_S)
    # run backwards in time, each dip gets a straight ramp ahead of it
    dip = (np.maximum.accumulate(dip[::-1] + t / LOOK_AHEAD_S) - t / LOOK_AHEAD_S)[::-1]
    low_pass = signal.firwin(255, EDGE_HZ, window=("kaiser", 8), fs=SR)
    return signal.oaconvolve(dry * (1 - dip), low_pass[None], "same")


dry = scene()
out = record(dry)
transcribe(out)
```